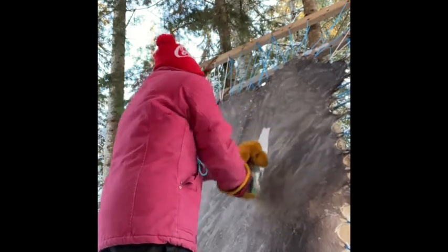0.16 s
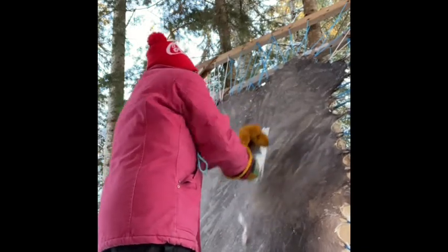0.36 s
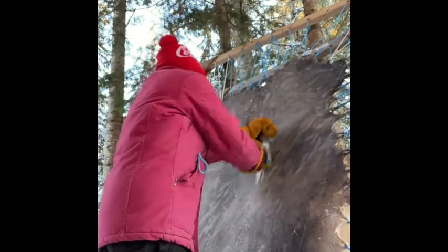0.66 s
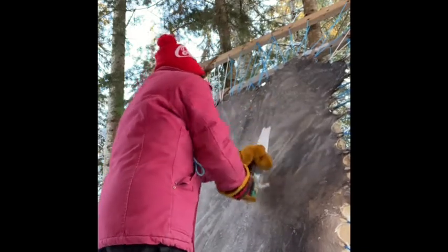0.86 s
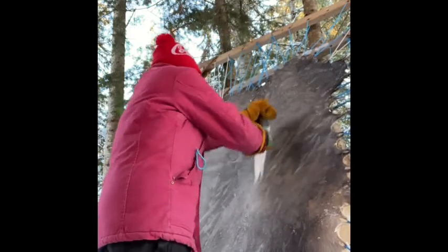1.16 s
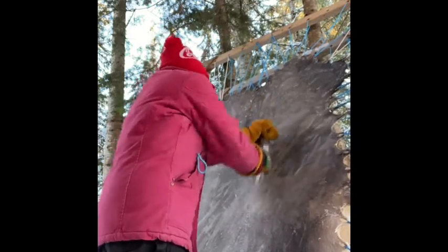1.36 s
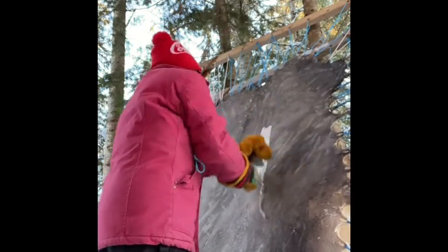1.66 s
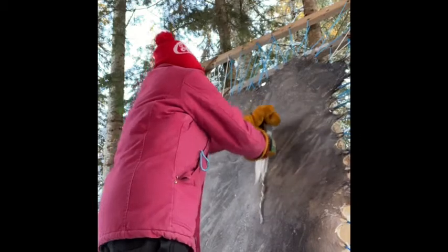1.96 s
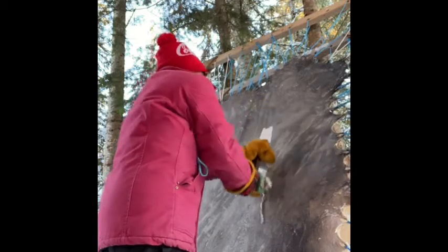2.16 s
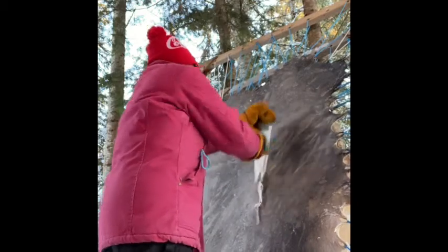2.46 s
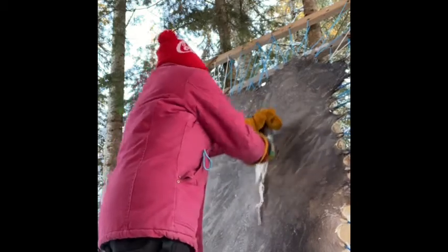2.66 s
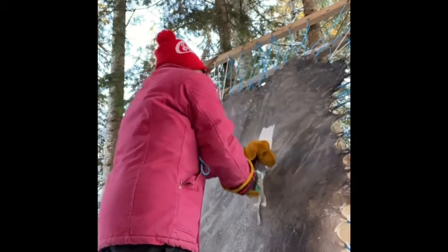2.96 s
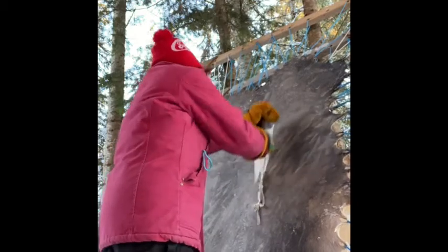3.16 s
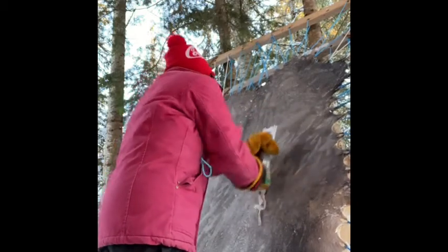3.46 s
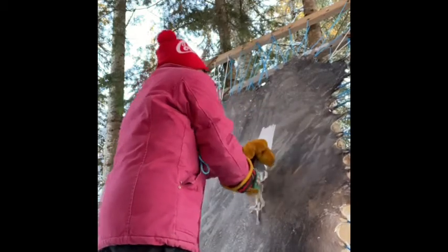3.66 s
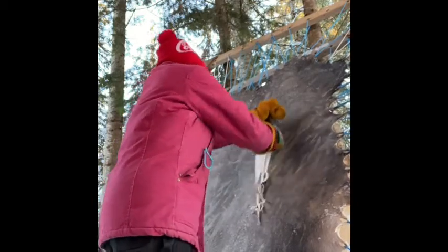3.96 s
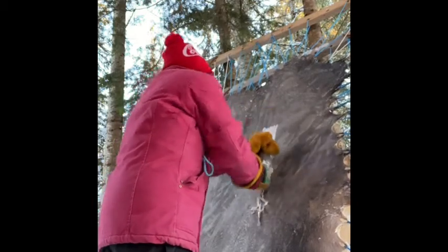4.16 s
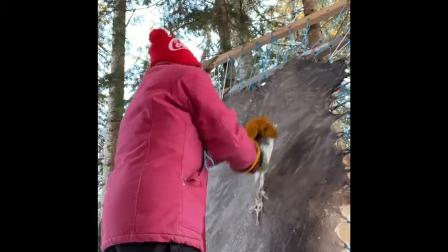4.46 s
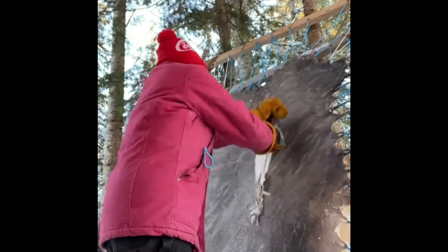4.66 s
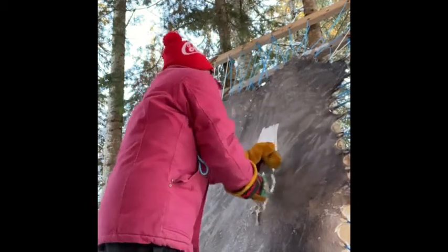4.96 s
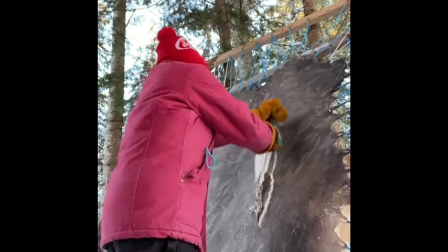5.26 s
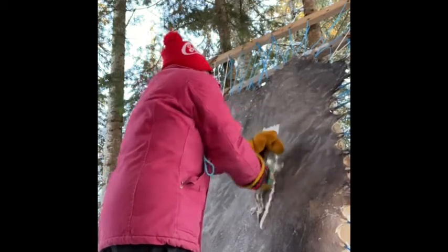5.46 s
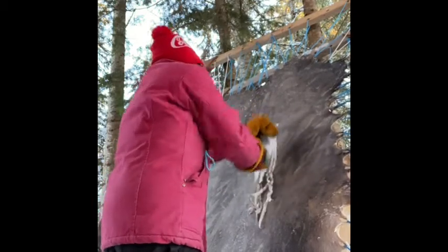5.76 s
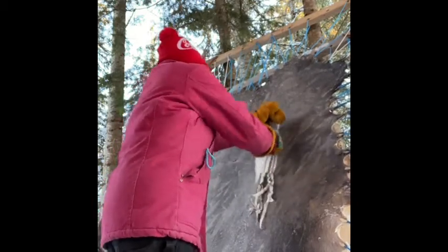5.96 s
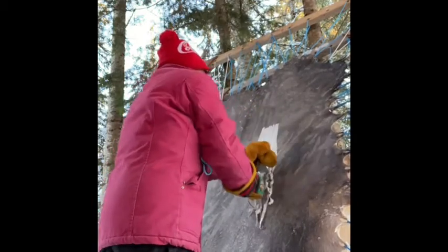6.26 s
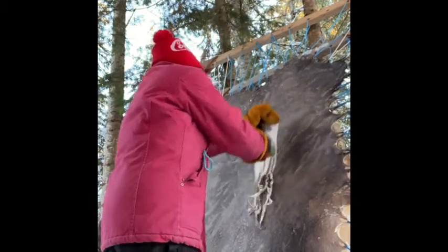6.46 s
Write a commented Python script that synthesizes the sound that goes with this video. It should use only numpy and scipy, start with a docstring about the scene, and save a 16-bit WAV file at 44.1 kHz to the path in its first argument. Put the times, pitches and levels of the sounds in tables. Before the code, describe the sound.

A hand scraper rasps down a stretched frozen hide in steady strokes, each opening with a dull knock, in quiet winter woods.

```python
"""A hand scraper is pulled down a frozen hide stretched on a pole frame, stroke after stroke.
The first pull is already under way; each later one opens with a knock, as the landing blade sends bending
waves through the hide. Then stick-slip friction rasps: thousands of tiny catches ring the blade and the
stiff hide, and the tones come forward as the pull slows. After the lift, sleeves rustle, frost and
shavings tick and the tool bumps the hide. Behind it all the winter wood is nearly still."""
import sys
import numpy as np
from scipy import signal
from scipy.fft import rfft, irfft, next_fast_len
from scipy.io import wavfile

SR = 44100
rng = np.random.default_rng(int(sys.argv[2]) if len(sys.argv) > 2 else 0)


def dump_mix(stems):
    """Bounce the given channels to the path in sys.argv[1] as a 16-bit WAV at rate SR."""
    frames = np.atleast_2d(stems).T  # one column per channel
    limited = np.clip(frames, -1, 1)  # hard clip at full scale
    pcm = np.round(limited * 32767).astype(np.int16)
    wavfile.write(sys.argv[1], SR, pcm)


N = 291501
TIME = np.arange(N) / SR
FFT_SIZE = 2 * next_fast_len(N // 2 + 1, real=True)
HZ = np.maximum(np.fft.rfftfreq(FFT_SIZE, 1 / SR), 10)

# The pulls. Each row: start and length in seconds, crest level in dB, level at the lift in dB re the
# crest, offsets in dB for ring, hum, body and bark, then levels in dB of the rustle and the boom.
STROKES = [(-.2, 0.32, -21, -13, -5, -6, -0.5, -10.5, -47, -35),
           (0.469, 0.36, -23.5, -16, -1, 1, 0, -2, -50.5, -34.5),
           (1.154, 0.3, -25.5, -11, 2, 6.5, 1.5, 2.5, -50, -33.5),
           (1.829, .3, -24, -13, -0.5, 1.5, -2.5, 1, -49.5, -36),
           (2.498, 0.31, -26, -9.5, 2.5, -1.5, 0.5, 2, -52, -36),
           (3.188, 0.3, -25, -13.5, 1.5, 3.5, 3, 1.5, -49.5, -34.5),
           (3.857, 0.39, -25.5, -19, 0, 2.5, 0, 2, -53.5, -36.5),
           (4.564, 0.27, -23.5, -15, 1, -1.5, -2.5, 0.5, -46, -38),
           (5.202, .29, -24, -13.5, -0.5, 6.5, -0.5, 1, -51.5, -37),
           (5.851, 0.31, -24, -12.5, -2, 5, -1.5, 0, -51, -35.5),
           (6.501, 0.29, -23, -18, -1, -7, -2, -5.5, -50, -39.5)]
def scraping():
    """Forced vibration: one friction force drives the resonances of blade and hide together."""
    strokes = np.array(STROKES)
    current = strokes[np.searchsorted(strokes[:, 0] - 0.012, TIME, "right") - 1]   # from 12 ms ahead
    pull_db, progress = pull()
    ring_db, hum_db, body_db, bark_db = current[:, 4:8].T + slowing(progress) + digging()
    edge = catches(14000, spread_db=2, judder_db=1, judder_hz=40)
    hiss = rasp(edge)
    ring = blade_ring(edge, progress) * from_db(ring_db)
    body = hide_body(edge)
    bark = blade_bark(edge) * from_db(bark_db - 2.5)
    friction = from_db(pull_db) * (hiss + ring + body * from_db(body_db) + bark)
    hum = blade_hum(pull_db + hum_db - 7)
    boom = hide_boom(edge, age_s=TIME - current[:, 0]) * from_db(current[:, 9])
    return friction + hum + boom + scuff(edge, hiss, body)

# The attack of a pull. Each row: time from its start in seconds, level in dB re the crest.
BITE = [(0.0, -34), (.025, -9), (.06, -2.5), (.095, -0.5), (.15, -1)]
RELEASE_S, RELEASE_DB = 0.034, -23.5   # the edge leaves the hide
def pull():
    """Friction lasts as long as contact: the envelope in dB, and progress from 0 to 1 at the lift."""
    level, progress = [], []
    for start, length, crest_db, lift_db, *_ in STROKES:
        end, end_db = start + length, crest_db + lift_db
        free = end + RELEASE_S
        level += [(start - 0.015, -110)] + [(start + t, crest_db + db) for t, db in BITE]
        level += [(end, end_db), (free, end_db + RELEASE_DB), (free + 0.015, -110)]
        progress += [(start, 0), (end, 1), (free, 1.1), (free + 0.1, 1.1)]
    return in_time(level)[0], in_time(progress)[0]

# Timbre along a pull. Each row: progress, then offsets in dB for ring, hum, body and bark.
TONE_BALANCE = [(0.0, -10, -8, 11.5, -6), (0.099, -2, -6, 0.5, -1), (.3, 1.5, -16, -5, -1),
                (.6, 4, -2.5, 0.5, -1), (.85, 5, 6, 1.5, -1.5), (1.0, 0.5, 2.5, 4, -4.5),
                (1.1, -23, 0.5, 6.5, 3)]
def slowing(progress):
    """Sliding speed shapes the spectrum: the tones come forward as the pull slows."""
    stages, *offsets_db = np.transpose(TONE_BALANCE)
    return np.array([np.interp(progress, stages, db) for db in offsets_db])

# Digs. Each row: centre and half width in seconds, then offsets in dB for ring, hum, body and bark.
DIGS = [(.575, 0.03, 1, 4, -1.5, 3), (.745, 0.048, 2, 7, 3, 4), (1.19, .03, -1.5, 8.5, -0.5, 2.5),
        (1.34, 0.052, 4.5, -3.5, 2, 4.5), (1.44, 0.059, 0, 3.5, -1, 2.5), (2.0, 0.053, 2.5, -3, 0.5, -4),
        (2.11, .04, -0.5, 9, 0, 5), (2.675, 0.025, 4.5, 11, 2, 5.5), (3.28, 0.067, 0, -1.5, -1, 3),
        (3.36, .04, 0.5, 2, -1.5, -1.5), (4.035, 0.056, 3.5, 12, 7, 4), (4.155, 0.028, -1.5, 8.5, 4.5, -4),
        (4.235, 0.023, 6, 1, 4, 3), (4.69, 0.028, 5.5, -4.5, 0.5, 0), (5.33, 0.053, 3, -12, -2.5, 2),
        (5.44, 0.035, 2, 9, 2.5, 2.5), (6.0, .04, 3.5, 8, -2, 0.5), (6.13, 0.083, 1, -0.5, 1, 1)]
def digging():
    """Contact sets the excitation: as the edge digs in, the balance shifts along a Gaussian bell."""
    offsets_db = np.zeros((4, N))
    for centre, half, *db in DIGS:
        near = slice(round((centre - 3 * half) * SR), round((centre + 3 * half) * SR))
        offsets_db[:, near] += np.outer(db, np.exp(-((TIME[near] - centre) / half) ** 2))
    return offsets_db

def catches(per_s, spread_db, judder_db, judder_hz):
    """Stick-slip friction: fibres catch and let go as random clicks of uneven, juddering strength."""
    sizes = from_db(spread_db * np.minimum(rng.exponential(1, N), 4)) * rng.choice([-1, 1], N)
    slips = rng.random(N) < per_s / SR
    return unit_rms(sizes * slips * from_db(judder_db * drift(judder_hz)))

# The rasp. Each row: frequency in Hz, relative spectral level in dB.
RASP_SPECTRUM = [(1000, -1.5), (2850, -6), (4500, -6.5), (6000, -8), (7300, -3.5), (9000, -3.5),
                 (11000, -8), (13500, -1), (15500, 0)]
def rasp(edge):
    """Modal overlap: many fluctuating resonances merge into broadband noise."""
    bands = shifting(edge, log_bands(900, 15000, count=60), depth_db=3.8, rate_hz=9.4)
    return unit_rms(coloured(bands, RASP_SPECTRUM)) * from_db(3.5)

# High blade modes. Each row: frequency and bandwidth in Hz, relative gain in dB.
RING_MODES = [(3435, 160, -6), (3600, 110, -17), (3767, 97, 5.5), (3740, 110, 3), (3843, 62, 10.5),
              (3900, 55, -8), (3950, 79, -18.5)]
def blade_ring(edge, progress):
    """Resonance: the blade rings brightly, its lower modes taking over along the pull."""
    force = edge * from_db(1.2 * drift(70))
    lean = -0.2059 * (progress - 0.5)
    return shifting(force, RING_MODES, depth_db=1.8, rate_hz=18, lean_db_per_hz=lean)

# Middle blade modes. Each row: frequency and bandwidth in Hz, relative gain in dB.
BARK_MODES = [(1080, 190, 3), (1260, 110, 0), (1500, 54, -8.5), (1800, 28, 4.5), (1993, 70, 3),
              (2111, 90, 7.5), (2315, 31, 6.5)]
def blade_bark(edge):
    """Resonance: the catches excite the middle modes of the blade into a rough bark."""
    return shifting(edge, BARK_MODES, depth_db=2.8, rate_hz=14)

def blade_hum(level_db, hz=880):
    """Periodic stick-slip: the edge slips in step with the low blade note, which rings on faintly."""
    cycles = np.cumsum(hz * (1 + 0.02 * drift(45))) / SR
    note = np.sqrt(2) * np.sin(2 * np.pi * cycles) * from_db(level_db + 2.5 * drift(40))
    return note + from_db(-20) * resonate(note, [(hz, 5, 0)])

# Modes of the rubbed hide. Each row: frequency and bandwidth in Hz, relative gain in dB.
BODY_MODES = [(163, 8.3, -7.5), (285, 58, -2.5), (414.3, 42, 0), (503, 100, -2), (586.6, 75, 0.5),
              (751, 73, 2.5)]
def hide_body(edge):
    """Hide resonances: each mode swells and fades on its own as the edge travels."""
    return shifting(edge, BODY_MODES, depth_db=2.5, rate_hz=21.7)

# Lowest hide modes. Each row: frequency and bandwidth in Hz, relative gain in dB.
BOOM_MODES = [(64.3, 14, 2.5), (107, 6.8, -2.5)]
def hide_boom(edge, age_s, decay_db_per_s=51):
    """Damped membrane vibration: the whole hide booms on its frame, fading through each stroke."""
    return unit_rms(resonate(edge, BOOM_MODES)) * from_db(-decay_db_per_s * age_s)

# A hollow hide resonance. Its row: frequency and bandwidth in Hz, gain in dB.
SCUFF_MODE = [(330, 130, 22.5)]
def scuff(edge, hiss, body, at_s=4.937):
    """Grazing contact: the lifted blade brushes the hide once, and the hide answers hollowly."""
    level_db = -35.5 - 30 * np.abs(TIME - at_s) / 0.022   # 30 dB down 22 ms to either side
    return from_db(level_db) * (hiss + from_db(5.5) * body + resonate(edge, SCUFF_MODE))

# Modes of the struck hide. Each row: frequency in Hz, relative level in dB, 60 dB decay time in seconds.
STRUCK_MODES = [(62.6, -5.5, 0.13), (109.4, -8, 0.22), (180, -4, 0.22), (272.3, -6, 0.23), (413, 5, .05),
                (620, 4.5, 0.041), (817, -5.5, 0.051), (952, -5.5, 0.079), (1160, 3, 0.033),
                (1420, -7.5, 0.027), (1980, -18, 0.024)]
def blow(reach, mode_jitter, length=16384):
    """Dispersion of bending waves: treble arrives first, the frame reflects, the modes ring on."""
    t, hz = np.arange(length) / SR, np.fft.rfftfreq(length, 1 / SR)
    push = (hz / 700) / (1 + (hz / 800) ** 4.2)   # a padded contact holds little treble
    travel = -4j * np.pi * reach * 0.0846 * np.sqrt(hz)   # delay falls as 1 / sqrt(hz)
    reflection = from_db(-6.5) * np.exp(1.69 * travel - 2j * np.pi * hz * 0.0032) / (1 + (hz / 600) ** 2)
    sweep = irfft(push * np.exp(travel) * (1 + reflection), length)
    modes = sum(from_db(db + 1.9 * jitter) * np.sin(2 * np.pi * f * t) * from_db(-60 * t / t60)
                for (f, db, t60), jitter in zip(STRUCK_MODES, mode_jitter))
    swell = 1 - np.exp(-(t / 0.0061) ** 2)
    sound = sweep / np.max(np.abs(sweep)) + from_db(-7) * swell * modes
    return sound * (1 - t / t[-1]) / np.max(np.abs(sound))

def knocks(events, grit_t60):
    """Impact excitation: each contact is a blow on the hide with a short gritty crack on top."""
    out, t = np.zeros(N + SR), np.arange(4096) / SR
    jitters = rng.standard_normal((len(events), len(STRUCK_MODES)))
    noise = rng.standard_normal((len(events), len(t)))
    grits = signal.sosfilt(signal.butter(1, 1500, "high", fs=SR, output="sos"), noise)
    decay = from_db(-60 * t / 0.0032) + from_db(-4.5 - 60 * t / grit_t60)
    for (start, db, crack_db, reach), jitter, grit in zip(events, jitters, grits):
        i, sound = round(start * SR), blow(reach, jitter)
        sound[80:80 + len(t)] += from_db(crack_db) * grit * decay
        out[i:i + len(sound)] += from_db(db) * sound
    return out[:N]

# The blade lands. Each row: start in seconds, level in dB, crack in dB re that level.
LANDINGS = [(0.446, -16, -12), (1.135, -19.5, -12), (1.799, -17, -14), (2.477, -16.5, -15),
            (3.155, -17.5, -15.5), (3.84, -22, -11.5), (4.545, -19, -14), (5.167, -18, -17.5),
            (5.826, -15, -20.5), (6.482, -18.5, -14.5)]
# Tool or glove bumps the hide. Each row: as for a landing, then the bending wave's relative path length.
BUMPS = [(0.225, -41.5, -25, 0.86), (0.388, -46.5, -27, 0.82), (1.07, -47, -25, 0.89),
         (1.532, -34.5, -27, 0.76), (2.424, -45, -28, 0.9), (2.902, -38.5, -9, 0.73),
         (3.079, -50, -16, 0.92), (3.126, -46.5, -1, 0.75), (3.745, -46.5, -12.5, 0.89),
         (3.797, -46.5, -19, 0.87), (4.405, -47.5, -23, 1.0), (4.499, -48.5, -30, 1.0),
         (4.931, -27.5, -13, 0.97), (5.109, -53.5, -25, 0.93), (5.786, -51, -27, 0.96),
         (6.321, -45, -21.5, 0.82), (6.448, -47, -27, 0.81)]
def impacts():
    """Impulse responses of the hide: firm landings of the blade and lighter bumps between strokes."""
    landings = [(*row, 0.97) for row in LANDINGS]   # all share one path length
    return knocks(landings, grit_t60=0.08) + knocks(BUMPS, grit_t60=0.14)

# Frost and shavings snap off. Each row: start in seconds, peak level in dB, centre frequency in Hz.
TICKS = [(0.194, -40, 3700), (0.2267, -36, 2170), (0.255, -40, 2160), (0.2763, -47, 2160),
         (1.62, -39, 3080), (1.624, -38, 2410), (1.6787, -42.5, 5190), (2.1927, -42, 2140),
         (3.13, -45, 2060), (4.3034, -44, 5950), (4.3246, -39, 5940), (4.35, -26, 9200),
         (4.3542, -31.5, 5810), (4.3664, -40, 7920), (4.8836, -24, 5860), (4.9076, -42, 2910),
         (4.9654, -40, 4590), (4.9776, -40, 8860), (5.0124, -40, 2410), (5.018, -34.5, 7260),
         (5.0344, -39, 7650), (5.1106, -44, 6800), (5.1452, -44, 3250), (5.53, -34, 6030),
         (5.5644, -43.5, 3480), (5.7625, -38, 5860), (6.2295, -27.5, 5530), (6.2751, -37, 10400)]
def ticks(t60=0.015):
    """Brittle fracture: each snap is a decaying burst of noise about its own pitch."""
    out, t = np.zeros(N + SR), np.arange(2048) / SR
    for start, db, hz in TICKS:
        burst = rng.standard_normal(len(t)) * from_db(-60 * t / t60)
        snap = resonate(burst, [(hz, 0.65 * hz, 0)])
        i = round(start * SR)
        out[i:i + len(t)] += from_db(db) * snap / np.max(np.abs(snap))
    return out[:N]

# The two bands of the rustle. Each row: frequency in Hz, relative spectral level in dB.
DULL_SPECTRUM = [(150, -2), (600, -11.5), (1500, -22)]
BRIGHT_SPECTRUM = [(2000, 8.5), (6000, -0.5), (13000, -0.5)]
# The tool is lifted back. Each row: time after release in seconds, dull and bright offsets in dB.
RUSTLE_FADE = [(0.0, 2.5, -1), (.06, -10, -12), (.19, -16.5, -18.5)]
def rustle():
    """Granular noise: tiny slips of sleeves and shavings add up, with a sparse crackle of frost."""
    levels = []
    for start, length, *_, rustle_db, _ in STROKES:
        free = start + length + RELEASE_S
        levels += [(start - 0.045, -71.5, -68)]   # at rest just before the landing
        levels += [(free + t, rustle_db + dull, rustle_db + bright) for t, dull, bright in RUSTLE_FADE]
    dull_db, bright_db = in_time(levels)
    grains = catches(5000, spread_db=2, judder_db=0.5, judder_hz=50)
    crackle = grains + from_db(-5) * catches(60, spread_db=4, judder_db=2.5, judder_hz=5)
    dull = coloured(shifting(grains, log_bands(120, 1800, count=6), 6.5, 30), DULL_SPECTRUM)
    bright = coloured(shifting(crackle, log_bands(2000, 13000, count=8), 5.5, 9.2), BRIGHT_SPECTRUM)
    return from_db(dull_db) * unit_rms(dull) + from_db(bright_db) * unit_rms(bright)

# The air of the wood. Each row: frequency in Hz, relative spectral level in dB.
AIR_SPECTRUM = [(18, -31), (30, -11.5), (76, 3), (280, -18.5), (713, -10.5), (1600, -18), (2120, -22.5),
                (6660, -23.5), (11800, -29.5), (14900, -61.5)]
def still_air(level_db=-61):
    """Stationary noise: a faint, steady background, strongest in the bass."""
    return from_db(level_db) * unit_rms(coloured(rng.standard_normal(N), AIR_SPECTRUM))

# Stereo balance. Each row: frequency in Hz, left over right in dB.
LEFT_EXCESS = [(110, 0), (200, 1), (370, 5.5), (690, 7.5), (1260, 1), (2320, 0), (4270, 0)]
# Stereo phase. Each row: frequency in Hz, left minus right in radians.
LEFT_PHASE = [(150, 0), (430, -.3), (950, -1.1), (1550, -.35), (2500, -.6), (3620, -.1), (6720, -.1),
              (9130, -.9), (11700, -1.8), (13000, -2.4), (13600, -3.1)]
# A fluctuating share, opposite in sign left and right. Each row: frequency in Hz, gain in dB.
SIDE_SHARE = [(60, -33), (150, -30), (400, -16), (800, -11), (2000, -13), (5000, -19), (9000, -4),
              (14000, -8)]
def stereo(x):
    """Stereo level and phase by frequency; the highest treble is opposite in phase and sounds wide."""
    tilt = from_db(at_hz(LEFT_EXCESS) / 2) * np.exp(0.5j * at_hz(LEFT_PHASE))
    steady = rfft(x, FFT_SIZE) * np.array([tilt, 1 / tilt])
    side = from_db(at_hz(SIDE_SHARE)) * rfft(x * drift(60), FFT_SIZE)
    return irfft(steady + side * [[1], [-1]])[:, :N]

def resonate(x, modes):
    """Superposition: two-pole resonators in parallel, alternating in sign."""
    out = 0
    for k, (hz, width, db) in enumerate(modes):
        r = np.exp(-np.pi * width / SR)
        b = (1 - r * r) / 2 * np.array([1, 0, -1])
        a = [1, -2 * r * np.cos(2 * np.pi * hz / SR), r * r]
        out = out + (-1) ** k * from_db(db) * signal.lfilter(b, a, x)
    return out

def shifting(x, modes, depth_db, rate_hz, lean_db_per_hz=0):
    """Amplitude modulation: each mode's drive wanders on its own; a lean favours low or high modes."""
    middle_hz, out = np.median([mode[0] for mode in modes]), 0
    for mode in modes:
        lean_db = lean_db_per_hz * np.clip(mode[0] - middle_hz, -150, 150)
        out = out + resonate(x * from_db(depth_db * drift(rate_hz) + lean_db), [mode])
    return unit_rms(out)

def log_bands(low, high, count):
    """Constant-Q resonances, spaced evenly in pitch."""
    return [(hz, 0.67 * hz * np.log(high / low) / count, 0) for hz in np.geomspace(low, high, count)]

def drift(rate_hz):
    """Low-passed noise: a slow random wander with an rms near 1."""
    r = np.exp(-32 * np.pi * rate_hz / SR)   # one step every 16 samples
    slow = signal.lfilter([1], [1, -2 * r, r * r], rng.standard_normal(N // 16 + 2002))[2000:]
    return np.interp(np.arange(N) / 16, np.arange(len(slow)), unit_rms(slow))

def coloured(x, spectrum):
    """Spectral shaping, with a gain of -60 dB from an octave beyond the table's ends."""
    closed = [(spectrum[0][0] / 2, -60), *spectrum, (spectrum[-1][0] * 2, -60)]
    return irfft(rfft(x, FFT_SIZE) * from_db(at_hz(closed)))[:N]

def at_hz(rows):
    """A table interpolated over log frequency."""
    hz, values = np.transpose(rows)
    return np.interp(np.log(HZ), np.log(np.maximum(hz, 10)), values)

def in_time(rows):
    """Table columns interpolated at every sample."""
    seconds, *columns = np.transpose(rows)
    return [np.interp(TIME, seconds, column) for column in columns]

def from_db(db):
    """Amplitude ratio of a level in dB."""
    return np.exp(np.asarray(db) * (np.log(10) / 20))

def unit_rms(x):
    """Normalisation to rms 1."""
    return x / np.sqrt(np.mean(x ** 2) + 1e-20)

def scene():
    """Superposition: tool, hide and still air add up and are spread in stereo."""
    return stereo(scraping() + rustle() + impacts() + ticks() + still_air())

def record(dry):
    """Band limiting: the microphone drops the deepest bass, and the top is cut."""
    bass_cut = signal.butter(3, 45, "high", fs=SR, output="sos")
    treble_cut = signal.cheby2(12, 70, 15700, fs=SR, output="sos")
    return signal.sosfilt(treble_cut, signal.sosfilt(bass_cut, dry))

dry = scene()
out = record(dry)
dump_mix(out)
```